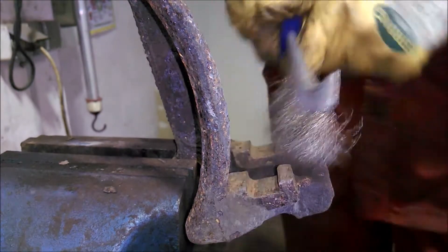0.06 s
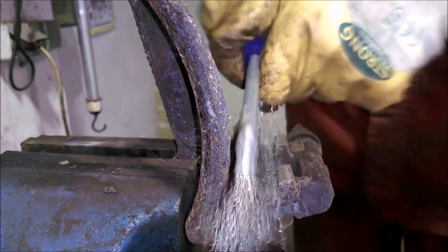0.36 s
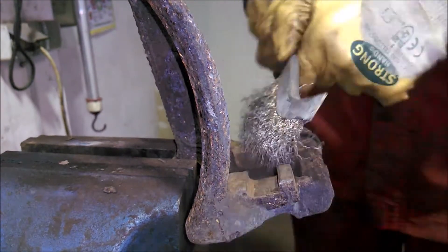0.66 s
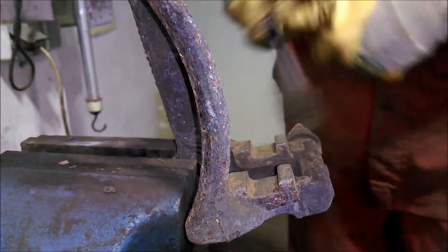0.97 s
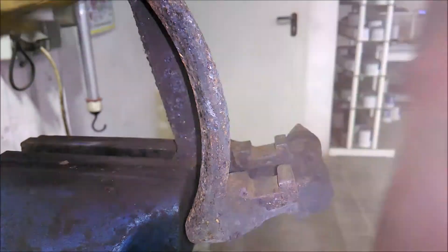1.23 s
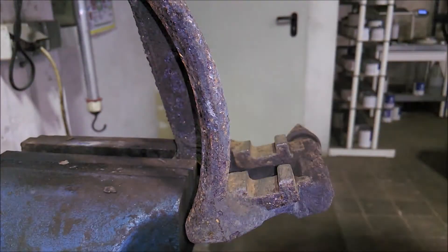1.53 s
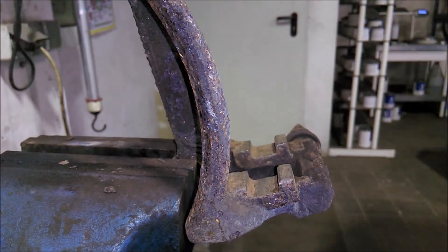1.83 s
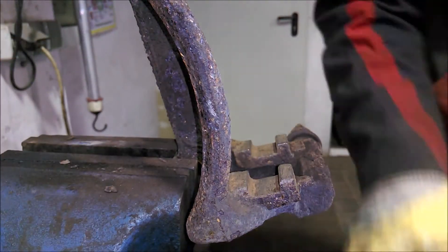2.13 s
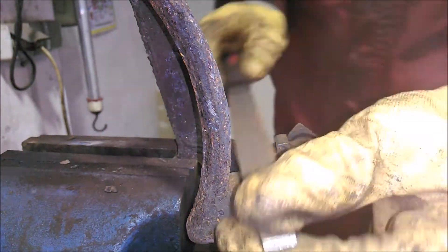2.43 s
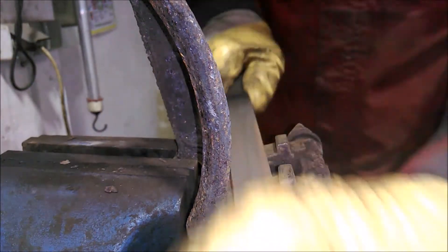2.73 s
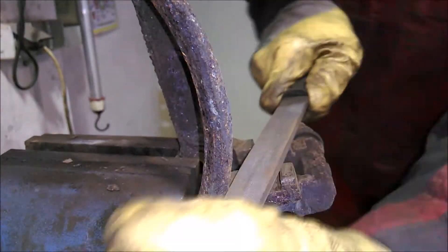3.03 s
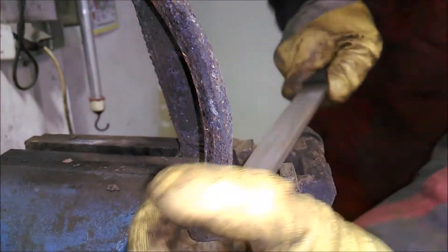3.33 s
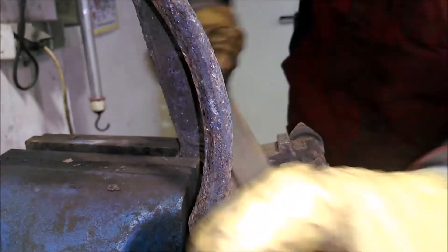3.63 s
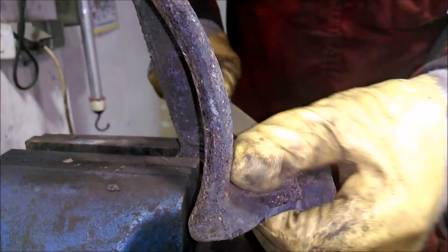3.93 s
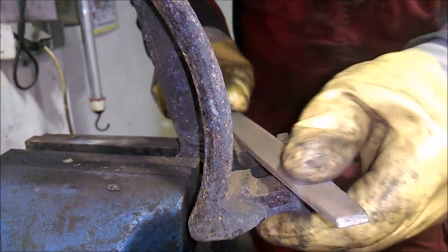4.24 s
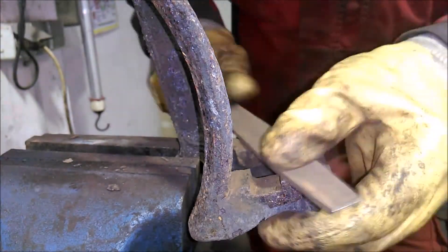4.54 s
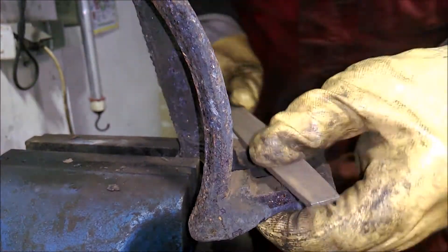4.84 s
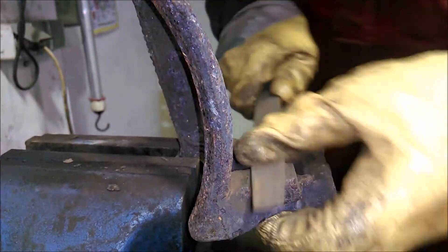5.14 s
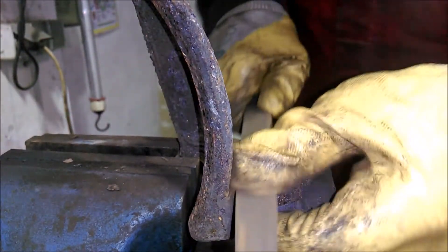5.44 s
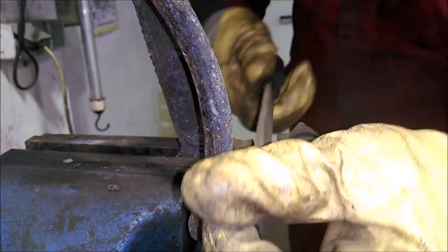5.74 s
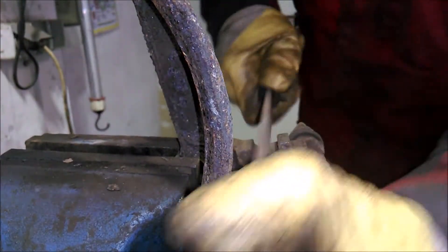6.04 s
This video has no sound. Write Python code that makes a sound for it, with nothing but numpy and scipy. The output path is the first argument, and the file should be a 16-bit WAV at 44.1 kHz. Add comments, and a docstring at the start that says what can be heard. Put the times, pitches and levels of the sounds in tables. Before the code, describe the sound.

Heard close up in a hard-walled workshop, rapid wire brushing rasps over a clamped steel casting. It stops, leaving light taps and soft, more distant puffs of hiss, then a sharp clack as the tool is put down. For the rest of the time a metal blade scrapes back and forth in fast, uneven bursts, coarse and sizzling, with a shifting high ring, small metallic ticks and a few louder knocks.

```python
"""A wire brush, then a flat steel blade, scrub a rusty steel casting clamped in a vise, close to a
stereo microphone in a hard-walled workshop. Each stroke tears off a stream of grains that hiss at
the contact and set casting and vise ringing. The brush goes to and fro at about thirty strokes a
second; a few airy hisses follow from further off; the brush clacks down on the bench; then the
blade scrapes in quick runs, among steel ticks and tool knocks, over short echoes and quiet room tone."""
import sys
import numpy as np
from scipy import signal
from scipy.fft import rfft, irfft
from scipy.io import wavfile
from scipy.ndimage import uniform_filter1d

SR = 44100
rng = np.random.default_rng(int(sys.argv[2]) if len(sys.argv) > 2 else 0)


def log_audio(samples):
    """Write samples as a 16-bit WAV file to the path given in sys.argv[1]."""
    # one column per channel
    frames = np.atleast_2d(samples).T
    # limit to full scale, then quantise
    limited = np.clip(frames, -1, 1)
    pcm = np.round(limited * 32767).astype(np.int16)
    wavfile.write(sys.argv[1], SR, pcm)


N = 277389
TIME = np.arange(N) / SR
HZ = np.maximum(np.arange(N // 2 + 1) * SR / N, 1)

# runs of evenly paced strokes, push and return in turn:
# first_s, last_s, count, push_over_return_db, hiss_db, drone_db
BRUSH_STROKE_RUNS = [(0.013, 0.517, 16, 7.5, -2.5, 1.5), (0.551, 0.977, 14, 7, -2, 1)]
BLADE_STROKE_RUNS = [(2.472, 2.565, 4, 0, -2, -8), (2.603, 2.603, 1, 0, -3, -8),
                     (2.651, 2.761, 4, 0, -0.5, -7), (2.797, 3.006, 7, 0, -5, -5),
                     (3.04, 3.693, 20, 5.5, 0, -7.5), (3.756, 3.873, 4, -2, 1, -8),
                     (3.908, 4.24, 11, 5.5, 1, -8.5), (4.275, 4.351, 3, 4, 1.5, -7.5),
                     (4.55, 4.622, 3, 0, -6, -12), (4.654, 4.79, 5, 1, -2.5, -7.5),
                     (4.82, 5.251, 15, 0, -2.5, -7.5), (5.314, 5.587, 10, 0, -7.5, -8.5),
                     (5.613, 5.698, 4, 0, 0, -5.5), (5.738, 5.832, 3, 3, -4, -9),
                     (5.962, 6.024, 2, -1, 0.5, -3.5), (6.064, 6.269, 6, 2, -0.5, -4)]
# how hard the hand bears on the tool: time_s, pressure_db
BRUSH_HAND_PRESSURE = [(0.015, -43), (0.08, -43.5), (0.16, -51), (0.225, -47), (0.35, -44), (0.48, -42.5),
                       (0.6, -45), (0.75, -44), (0.89, -47), (0.97, -41.5)]
BLADE_HAND_PRESSURE = [(2.47, -50.5), (2.56, -57), (2.65, -36), (2.74, -40), (2.85, -36), (2.99, -50),
                       (3.11, -38), (3.27, -39.5), (3.56, -36.5), (3.7, -48.5), (3.781, -40.5), (3.87, -43),
                       (4.08, -38.5), (4.16, -52.5), (4.24, -62), (4.28, -44.5), (4.35, -40), (4.58, -58),
                       (4.66, -42.5), (4.8, -39), (4.99, -45.5), (5.06, -42), (5.22, -41), (5.255, -49),
                       (5.3, -38.5), (5.55, -39.5), (5.61, -48), (5.74, -44.5), (5.83, -57), (5.96, -43),
                       (6.15, -42.5), (6.28, -47)]
# colour of the friction on the rust: frequency_hz, level_db
BRUSH_SPECTRUM = [(90, -53), (160, -22), (230, -10.5), (350, -5.5), (560, -9.5), (750, -14.5), (1200, -19),
                  (1750, -19), (2700, -4), (4000, -7), (6000, -8), (9500, -10), (16000, -3)]
BLADE_SPECTRUM = [(90, -8.5), (160, -7.5), (230, -3), (330, -3.5), (530, -1), (750, -9), (1650, -6.5),
                  (2150, -1.5), (3000, -3), (4000, -3), (7000, -4.5), (13000, -2.5), (15600, -6)]
# where the blade sings, as the grip changes its free length: time_s, pitch_hz
BLADE_PITCH = [(2.72, 2840), (2.93, 3310), (3.12, 3080), (3.5, 3090), (4.29, 3270), (4.35, 2570),
               (4.55, 3300), (4.72, 2630), (5.14, 2720), (5.37, 3290), (5.51, 2480), (5.65, 2530),
               (5.73, 3070), (6.29, 2600)]
# how keenly the edge is set on the rust: time_s, sizzle_db
BLADE_KEENNESS = [(2.5, 3), (2.9, -6), (3.2, 2.5), (4.2, -1.5), (4.7, 5), (5.15, 9), (5.35, -5), (5.6, 8),
                  (5.9, -0.5), (6.25, -1)]
# resonances of casting, vise and tool, and two dead bands: pitch_hz, width_hz, lift_db
STEEL_MODES = [(243, 14, 14.5), (287, 51, 7.5), (442.8, 13.2, 11), (565, 126, 9.5), (794, 33, 9),
               (1017, 120, 9), (1348.5, 63, 14.5), (2397, 79, 8.5), (2890, 12, 9.5), (3103, 54, 4),
               (3436, 77, 13), (1555, 88, -3), (4300, 170, -10), (4865, 103, 6), (5460, 81, 7),
               (9166, 66, 8), (9320, 110, 6.5), (11300, 300, 5)]
# the bench's modes under the brush's blow: pitch_hz, level_db, t60_s
BENCH_MODES = [(328, -11.5, 0.023), (607, -9.5, 0.043), (958, -6.5, 0.018), (1236, -5.5, 0.027),
               (1446, -1.5, 0.02), (2770, -10.5, 0.012), (3760, -6, 0.0056)]
# a tool touches down or its edge catches: start_s, level_db, pitch_hz, relative_crack_db
STEEL_TICKS = [(2.157, -38, 3360, 3), (2.167, -31, 3370, -0.5), (2.435, -39.5, 2930, 8),
               (2.507, -49, 3000, 10), (2.584, -45, 3000, 6), (2.791, -31, 3090, 2), (3.178, -28, 3110, -8),
               (3.518, -30, 3320, -11), (3.7485, -35.5, 3290, -1.5), (3.969, -36, 3310, 0),
               (4.257, -41.5, 3500, 11.5), (4.525, -43.5, 3440, 7), (5.301, -35, 3400, -3),
               (5.374, -33.5, 3420, 3), (5.528, -35, 2300, 6), (5.717, -33, 3360, 3),
               (5.73, -42, 2950, 8.5), (5.742, -37.5, 3060, 6.5)]
# tools knocking on bench and casting: start_s, level_db, pitch_hz, t60_s, relative_crack_db
TOOL_KNOCKS = [(1.22, -44, 1294, 0.081, -12), (1.226, -55, 158, 0.19, -18), (1.311, -39, 384, 0.068, -15),
               (1.377, -38, 1370, 0.031, -3.5), (1.474, -52, 1800, .05, 0), (2.171, -31.5, 1000, .045, -10),
               (2.219, -37, 276, 0.028, -32), (2.806, -16.5, 625, 0.014, -14.5),
               (2.813, -23, 1120, 0.027, -11), (2.833, -17.5, 298, 0.024, -11),
               (2.8396, -27, 1010, 0.026, -27), (3.573, -23.5, 870, 0.016, -23),
               (3.588, -19.5, 330, 0.016, -11.5), (5.943, -46.5, 600, 0.034, -10)]
# a tool dragged over the bench after it lands: middle_s, length_s, level_db
BENCH_DRAGS = [(2.19, 0.033, -50.5), (2.242, 0.029, -51), (2.334, 0.057, -59)]
# airy hisses further from the microphone: start_s, held_s, level_db
FAR_PUFFS = [(1.172, 0.055, -67), (1.528, 0.175, -50), (1.617, 0.016, -42), (1.795, 0.011, -50),
             (1.863, 0.015, -51), (1.945, 0.018, -53), (2.005, 0.011, -49.5)]
# colour of those hisses: frequency_hz, level_db
PUFF_SPECTRUM = [(500, -23), (2200, -13), (4000, -16), (6000, -5), (8300, 0), (11000, -1), (16000, -1)]
# the quiet workshop: frequency_hz, level_db
ROOM_TONE_SPECTRUM = [(20, 5.5), (50, -19.5), (90, -16), (160, 1), (400, -2), (1200, -10), (4000, -13),
                      (10000, -12), (16000, -15.5)]
# how alike the microphone's two ports sound: frequency_hz, likeness
PORT_LIKENESS = [(60, 0.5), (130, .5), (260, 1.05), (700, 0.43), (1400, 0.84), (2400, 0.12), (3200, 0.62),
                 (7000, -0.21), (16000, 0)]
# balance between the ports: frequency_hz, left_minus_right_db
PORT_BALANCE = [(250, 0.5), (1300, 0.5), (2400, 0), (3000, -1.5), (5000, 0.5), (7200, 6.5), (10000, 3),
                (14000, 4.5)]

FIRM_DB = -40   # the pressure of firm, steady work
STROKE_SPREAD_DB = .4   # no two strokes are quite alike
LINGERING = 0.14   # a light stroke skids on longer: dB of length per dB of pressure lost
HISS_SHARE = .88   # the hiss needs speed, so it fills only this share of a stroke


def brush():
    """Wire brush, close up: hundreds of wire tips make a fine, even grain."""
    grains = friction(BRUSH_SPECTRUM, grain_s=0.00065, spread_db=0.7)
    strokes = hand_strokes(BRUSH_STROKE_RUNS, BRUSH_HAND_PRESSURE, base_length_s=0.016,
                           shortening=0.73, ring_share=1.0, drone_share=0.68, drone_follows=0.93)
    return scrub(strokes, grains, hiss_db=2.0, ring_db=-3.5, drone_db=-2.0,
                 drone_top_hz=1670, ring_top_hz=5370)


def blade(song_db, song_width_hz, sizzle_hz):
    """One stiff edge breaks coarser flakes; it sings in fits at a shifting pitch and sizzles if keen."""
    grains = friction(BLADE_SPECTRUM, grain_s=.0012, spread_db=1.46)
    catches = grit(grain_s=0.0037, spread_db=4.0)   # the edge sticks and lets go
    strokes = hand_strokes(BLADE_STROKE_RUNS, BLADE_HAND_PRESSURE, base_length_s=.0165,
                           shortening=1.02, ring_share=0.67, drone_share=0.08, drone_follows=0.55)
    stroke_index = np.searchsorted(np.sort(strokes[:, 0] - strokes[:, 1]), TIME)
    detune = 2 ** (rng.standard_normal(len(strokes) + 1) / 14)   # each stroke bears on another spot
    pitch_hz = np.interp(TIME, *np.transpose(BLADE_PITCH)) * detune[stroke_index]
    song = moving_resonance(grains * catches, pitch_hz, song_width_hz)
    sizzle = irfft(rfft(grains) / (1 + (sizzle_hz / HZ) ** 20), N)
    keenness = from_db(np.interp(TIME, *np.transpose(BLADE_KEENNESS)))
    scrape = grains + from_db(song_db) * song + (keenness - 1) * sizzle
    return scrub(strokes, scrape, hiss_db=0.24, ring_db=-1.5, drone_db=-0.44,
                 drone_top_hz=1975, ring_top_hz=5040)


def hand_strokes(runs, pressure, base_length_s, shortening, ring_share, drone_share, drone_follows):
    """Push and return, the accented one shorter. Rows: middle_s, length_s, hiss_db, ring_db, drone_db."""
    rows = []
    for first_s, last_s, count, lead_db, hiss_db, drone_db in runs:
        middles = np.linspace(first_s, last_s, int(round(count)))
        accent = lead_db / 2 * (-1) ** np.arange(len(middles))
        force = np.interp(middles, *np.transpose(pressure))
        force += STROKE_SPREAD_DB * rng.standard_normal(len(middles))
        vise_force = FIRM_DB + drone_follows * (force - FIRM_DB)   # the heavy vise follows only in part
        lengths = base_length_s * from_db(LINGERING * (FIRM_DB - force) - shortening * accent)
        hiss = force + accent + hiss_db
        ring = force + ring_share * accent
        drone = vise_force + drone_share * accent + drone_db
        rows += zip(middles, lengths, hiss, ring, drone)
    return np.array(rows)


def scrub(strokes, grains, hiss_db, ring_db, drone_db, drone_top_hz, ring_top_hz):
    """Friction under the strokes drives the hissing contact, the ringing steel and the droning vise."""
    middles, lengths, *levels = np.transpose(strokes)
    layers = [(ring_top_hz, SR, hiss_db, HISS_SHARE),
              (drone_top_hz, ring_top_hz, ring_db, 1),
              (0, drone_top_hz, drone_db, 1)]
    out = 0
    for level_db, (low_hz, high_hz, gain_db, share) in zip(levels, layers):
        push = swells(middles, share * lengths, level_db + gain_db)
        sound = casting(band(grains * push, low_hz, high_hz, order=4))
        out = out + sound * rms(push) / rms(sound)
    return out


def swells(middles, lengths, levels_db):
    """Speed rises and falls within each stroke: a bell of power, its length taken at half height."""
    power = np.zeros(N)
    for middle, length, level_db in zip(middles, lengths, levels_db):
        span = slice(*np.searchsorted(TIME, [middle - 2 * length, middle + 2 * length]))
        power[span] += from_db(level_db) ** 2 * .5 ** ((2 * (TIME[span] - middle) / length) ** 2)
    return np.sqrt(power)


def friction(spectrum, grain_s, spread_db):
    """Grainy noise of the rubbing contact, as it reaches the microphone."""
    return colour(noise_at_ports(), spectrum) * grit(grain_s, spread_db)


def grit(grain_s, spread_db):
    """Uneven bite: the strength jumps from grain to grain; rms 1."""
    bumps = uniform_filter1d(rng.standard_normal(N), max(int(grain_s * SR), 1))
    strength = from_db(spread_db * np.clip(bumps / rms(bumps), -2.5, 2.5))
    return strength / rms(strength)


def casting(x):
    """Each resonance lifts its own narrow band and rings on briefly; the dead bands dip."""
    for hz, width_hz, lift_db in STEEL_MODES:
        ringing = signal.lfilter(*signal.iirpeak(hz, hz / width_hz, fs=SR), x)
        x = x + (from_db(lift_db) - 1) * ringing
    return x


def moving_resonance(x, hz, width_hz, block=128):
    """The blade's resonance, of gain 1, its centre following a pitch curve."""
    out, state = np.zeros_like(x), np.zeros((2, 2))
    radius = np.exp(-np.pi * width_hz / SR)
    zeros = np.array([1, 0, -1]) * (1 - radius ** 2) / 2
    for i in range(0, N, block):
        poles = [1, -2 * radius * np.cos(2 * np.pi * hz[i] / SR), radius ** 2]
        out[:, i:i + block], state = signal.lfilter(zeros, poles, x[:, i:i + block], zi=state)
    return out


def clack(start_s, gain_db):
    """The brush is put down hard: one blow rings the bench's well-damped modes."""
    t = np.clip(TIME - start_s, 0, 1)
    return sum((-1) ** k * from_db(gain_db + level_db - 60 * t / t60_s) * np.sin(2 * np.pi * hz * t)
               for k, (hz, level_db, t60_s) in enumerate(BENCH_MODES))


def knocks(blows, tone_db, clatter_db, spread, crack_t60_s):
    """A tool's blow: a damped main tone, a clatter of crowded modes around it and a bright crack."""
    out, t = np.zeros((2, N)), TIME[:SR // 8]
    noise = noise_at_ports()
    for start_s, level_db, hz, t60_s, crack_db in blows:
        span = slice(int(start_s * SR), int(start_s * SR) + len(t))
        clatter = band(noise[:, span], hz / spread, hz * spread, order=4)
        treble = band(noise[:, span], 2150, SR)
        tone = from_db(tone_db) * np.sin(2 * np.pi * hz * t)
        body = tone + from_db(clatter_db) * clatter / rms(clatter)
        crack = from_db(crack_db - 60 * t / crack_t60_s) * treble / rms(treble)
        out[:, span] += from_db(level_db) * (body * from_db(-60 * t / t60_s) + crack)
    return out


def ticks(t60_s):
    """Steel on steel: a very short crack and a clear little ring."""
    blows = [(start_s, level_db, hz, t60_s, crack_db) for start_s, level_db, hz, crack_db in STEEL_TICKS]
    return knocks(blows, tone_db=-4.0, clatter_db=-6.5, spread=1.3, crack_t60_s=0.014)


def drags(low_hz, high_hz):
    """A tool slides on the bench with a light, gritty scuff."""
    scuff = band(rng.standard_normal((2, N)), low_hz, high_hz, order=1)
    scuff *= grit(grain_s=0.00074, spread_db=3.0)
    return swells(*np.transpose(BENCH_DRAGS)) * scuff / rms(scuff)


def puffs(gain_db, attack_s, t60_s):
    """Bright hiss further off, one long rush and several short: each opens quickly, holds and dies."""
    air = colour(rng.standard_normal((2, N)), PUFF_SPECTRUM)
    power = np.zeros(N)
    for start_s, held_s, level_db in FAR_PUFFS:
        opening = np.clip((TIME - start_s) / attack_s, 0, 1)
        decay_db = 60 * np.clip(TIME - start_s - held_s, 0, 1) / t60_s
        power += (opening * from_db(level_db - decay_db)) ** 2
    return from_db(gain_db) * np.sqrt(power) * air / rms(air)


def workshop_echoes(x, first_echo_s, build_s, t60_s, dull_hz):
    """Diffuse echoes off bench and walls build quickly and die, a little duller than the direct sound."""
    t = TIME[:SR]
    build_up = np.clip((t - first_echo_s) / build_s, 0, 1)
    tail = rng.standard_normal((2, SR)) * from_db(-60 * t / t60_s) * build_up
    tail = band(tail / (rms(tail) * np.sqrt(SR)), 0, dull_hz, order=1)
    return signal.fftconvolve(x, tail, axes=1)[:, :N]


def room_tone(level_db):
    """The workshop's steady, low background noise."""
    noise = colour(noise_at_ports(), ROOM_TONE_SPECTRUM)
    return from_db(level_db) * noise / rms(noise)


def noise_at_ports(lag_s=.00006):
    """Noise at the microphone's two ports: alike in the bass, apart in the treble, the left nearer."""
    mid, side = rfft(rng.standard_normal((2, N)))
    alike = np.clip(over_hz(PORT_LIKENESS), -1, 1)
    sign = np.array([[1], [-1]])   # left, right
    paths = from_db(sign * over_hz(PORT_BALANCE) / 2) * np.exp(1j * np.pi * sign * HZ * lag_s)
    return irfft((np.sqrt(1 + alike) * mid + sign * np.sqrt(1 - alike) * side) * paths, N)


def from_db(db):
    """Decibels to gain."""
    return 10 ** (np.asarray(db) / 20)


def rms(x):
    """Root mean square."""
    return np.sqrt(np.mean(x ** 2) + 1e-20)


def over_hz(points):
    """A table of frequency_hz, value read at every frequency."""
    hz, value = np.transpose(points)
    return np.interp(np.log(HZ), np.log(hz), value)


def colour(x, spectrum):
    """Shape a sound by a smooth spectrum."""
    return irfft(rfft(x) * from_db(over_hz(spectrum)), N)


def band(x, low_hz, high_hz, order=2):
    """Causal band-pass."""
    edges = [max(low_hz, 10), min(high_hz, .45 * SR)]
    return signal.sosfilt(signal.butter(order, edges, "band", fs=SR, output="sos"), x + 1e-18)


def scene():
    """From beside the vise: the work close up, the hisses further off with more echo, the room behind."""
    near = brush() + blade(song_db=6.5, song_width_hz=175, sizzle_hz=12500)
    near += drags(low_hz=1800, high_hz=8300)
    near += clack(start_s=2.1405, gain_db=-20.5) + ticks(t60_s=0.049)
    near += knocks(TOOL_KNOCKS, tone_db=-6.5, clatter_db=-3.5, spread=1.89, crack_t60_s=0.031)
    far = puffs(gain_db=2.0, attack_s=0.0038, t60_s=0.086)
    into_room = from_db(-9) * near + from_db(-5) * far
    echoes = workshop_echoes(into_room, first_echo_s=.0015, build_s=0.0032, t60_s=0.31, dull_hz=11800)
    # the microphone's low cut thins the deep bass
    work = band(near + far + echoes, low_hz=173, high_hz=SR)
    return work + room_tone(level_db=-63)


def record(dry):
    """The top is cut steeply at 15750 Hz."""
    return signal.sosfilt(signal.ellip(12, .1, 80, 15750, fs=SR, output="sos"), dry)


dry = scene()
out = record(dry)
log_audio(out)
```